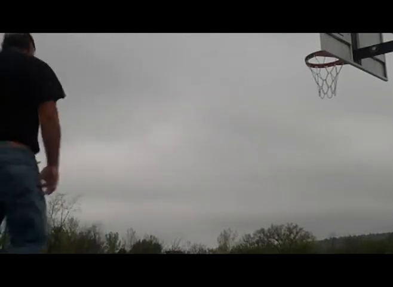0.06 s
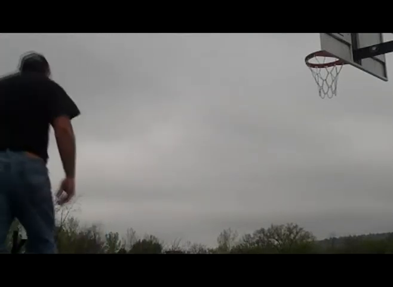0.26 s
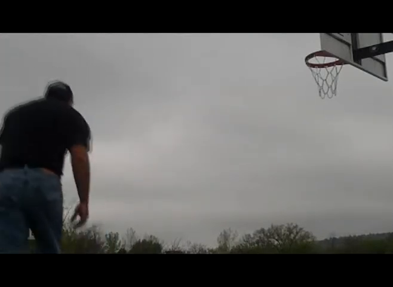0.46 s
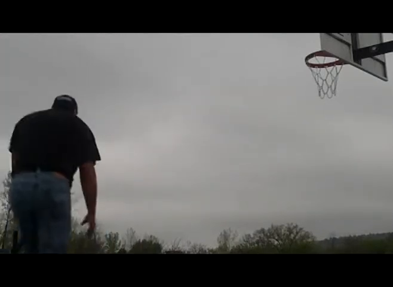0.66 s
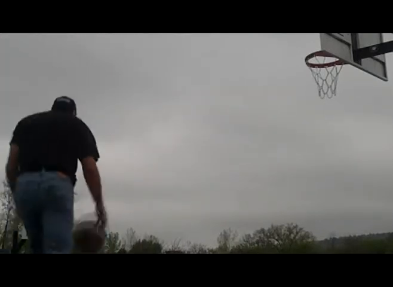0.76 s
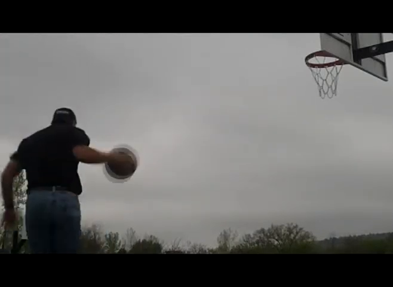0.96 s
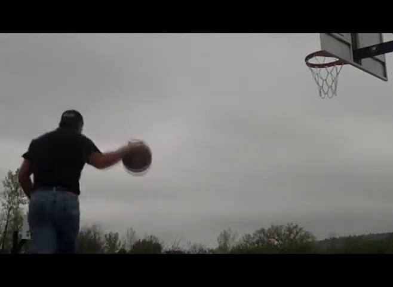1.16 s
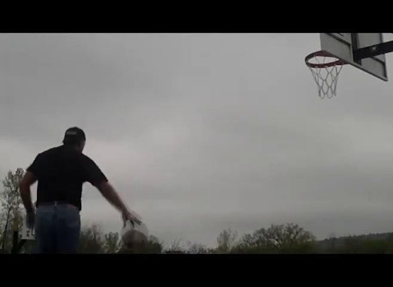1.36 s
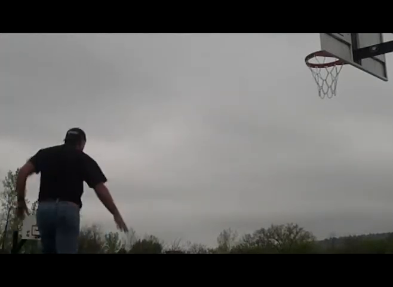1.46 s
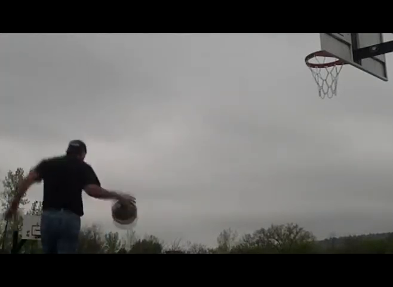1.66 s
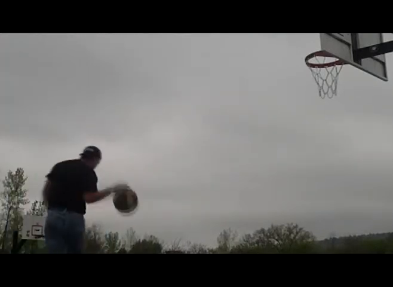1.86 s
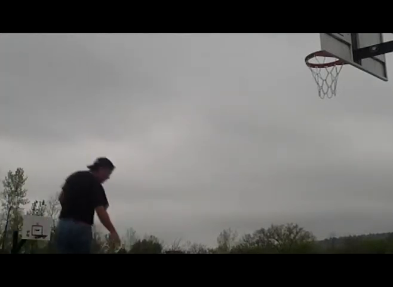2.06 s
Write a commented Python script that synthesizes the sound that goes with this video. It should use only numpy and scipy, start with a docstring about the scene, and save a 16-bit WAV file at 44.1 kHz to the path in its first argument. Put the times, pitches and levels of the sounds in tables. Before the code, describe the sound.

Three hollow basketball slaps on open-air hard ground, with gritty shoe scuffs and faint bird whistles

```python
"""A slowly fading outdoor hiss and a faint scuff, then at once the slap of a basketball on an open-air hard
court. Three bounces: each is a slap, a short hollow ring of struck modes and a snap as the ball leaves the
ground, plus noise bursts for grit and echo. Soles scuff as dense random grains, stones snap as short noise
bursts, feet and palm knock as single dull modes. Far birds whistle as gliding, randomly warbling sines. The
hiss is coloured noise; hiss and grit differ slightly between the two microphones."""
import sys
import numpy as np
from scipy import signal
from scipy.fft import rfft, irfft
from scipy.io import wavfile

SR = 44100
rng = np.random.default_rng(int(sys.argv[2]) if len(sys.argv) > 2 else 0)


def inscribe(sig):
    """Save sig as 16-bit PCM at rate SR to the path in sys.argv[1].

    A 1-D sig is mono; a 2-D sig holds one channel per row.
    Samples are clipped to [-1, 1] before scaling.
    """
    pcm = np.round(np.clip(np.atleast_2d(sig).T, -1, 1) * 32767)
    wavfile.write(sys.argv[1], SR, pcm.astype(np.int16))


N = 92610
T = np.arange(N) / SR

# distant traffic and trees: spectrum (frequency [Hz], weight [dB]); level (time [s], level [dB])
AIR_SPECTRUM = [(25, -33), (60, -21), (100, -15.5), (200, -10.5), (380, -2.5), (600, -0.5), (950, 2),
                (1250, -3), (1900, -11), (2900, -13.5), (3700, -22), (4600, -25.5), (6500, -30),
                (9000, -31.5), (11500, -35)]
AIR_LEVEL = [(0, -39), (.6, -42), (1.1, -42.5), (2.1, -43.5)]
# what the two microphones do not share: (frequency [Hz], weight [dB])
SIDE_SPECTRUM = [(100, -49), (400, -65), (650, -31), (1500, -17), (2400, -48), (3500, -35), (4800, -13),
                 (7500, -27)]
AIR_TOP_HZ, RECORDER_TOP_HZ = 11480, 15500

# bird whistles: (start [s], length [s], start pitch [Hz], end pitch [Hz], level [dB], rms warble [Hz])
WHISTLES = [(1.124, .035, 4100, 3820, -50, 240), (1.167, 0.077, 3200, 2710, -49.5, 141),
            (1.324, 0.044, 3450, 3180, -55, 80), (1.367, .08, 2670, 2405, -52, 70),
            (1.389, 0.083, 5400, 5900, -65, 218), (1.66, 0.055, 2700, 2610, -51, 24.9),
            (1.717, 0.18, 5550, 5280, -56.5, 425), (1.92, 0.078, 2890, 2870, -48.5, 40),
            (1.976, 0.045, 2645, 2660, -45.5, 45), (2.044, 0.074, 5680, 5400, -50, 403)]
# speed of the random warble: (frequency [Hz], weight [dB])
WARBLE_SPECTRUM = [(150, 2.5), (400, 0.5), (1500, -41)]

# soft knocks of feet and palm: (time [s], level [dB], pitch [Hz])
KNOCKS = [(.207, -23.5, 538), (0.2554, -18, 586), (0.3417, -15, 907), (.3915, -16, 870),
          (1.136, -26.5, 1110), (2.053, -29.5, 1410)]
KNOCK_T60_S = 0.022

# soles and clothes scuffing: (start [s], length [s], level [dB], low grind re scrape [dB])
SCUFFS = [(.008, 0.024, -36, -14), (0.081, 0.014, -37.5, 7), (0.191, 0.033, -34, -22),
          (0.246, 0.016, -47, 1), (0.286, 0.03, -47, 3.5), (0.325, 0.036, -37.5, 3), (.366, .015, -32, 1),
          (0.386, 0.046, -34, 2.5), (0.456, 0.026, -46, 0.5), (0.497, 0.0254, -38, -7),
          (0.801, 0.0098, -42.5, -2.5), (1.265, 0.02, -49, 1.5), (1.649, 0.024, -45, -2),
          (1.914, 0.031, -50.5, 0), (2.028, 0.037, -49, -2)]
# scrape and low grind of the grit: (frequency [Hz], weight [dB])
SCRAPE_SPECTRUM = [(400, -30), (1200, 1), (2200, -7), (3100, 7.5), (4200, -12.5), (5300, -9.5),
                   (7000, -23.5), (10000, -29.5), (12000, -26), (13500, -62)]
GRIND_SPECTRUM = [(150, -47.5), (500, -9), (900, 10.5), (1500, 7), (2500, 3), (4000, -24), (9000, -44.5)]
# flicker of the grip: (frequency [Hz], weight [dB])
GRIP_SPECTRUM = [(20, -20), (80, -1), (200, -2), (600, -42), (2000, -80)]
SCUFF_EDGE_S, GRIP_FLICKER_RMS_DB = 0.011, 3.5
GRAINS_PER_S, GRAIN_SPREAD_DB = 4900, 4
# grit snapping under a shoe: (time [s], level [dB], t60 [s], tilt [dB per octave])
TICKS = [(0.124, -40, 0.013, 1), (0.197, -17, 0.017, -7.5), (0.2016, -37, .016, 4), (0.344, -29, 0.011, -4),
         (0.3902, -29, 0.011, 0), (0.4148, -36, 0.015, -6), (0.433, -32.5, 0.02, -8),
         (0.4848, -21.5, .007, 1.5), (0.498, -20.5, 0.011, -2.5), (0.5138, -26, 0.015, -7),
         (0.9008, -33.5, 0.014, 10), (1.7203, -35.5, 0.015, 2)]
# a stone snapping, before tilt: (frequency [Hz], weight [dB])
SNAP_SPECTRUM = [(500, -17), (1500, -9), (3200, 18), (5500, 3), (8500, -6.5), (11500, -60)]
SNAP_RISE_S = 0.00016

# bounces: (landing [s], boom [dB], hollow ring [dB], smack [dB], crack [dB], fizz [dB], pitch [ratio],
#           contact [s], lift-off re landing [dB], flight ring [dB], echo [dB], favoured mode [Hz],
#           starved mode [Hz], crack pitch [ratio])
BOUNCES = [(0.0511, -10, -4, 0, 1.5, -18, 1.025, .0100, -17.5, -4.5, -3, 1250, 1810, 1.056),
           (0.7388, -15.5, -4, -14, -7.5, -28.5, 1.045, 0.0089, -8, -11, -0.5, 1010, 620, 1.09),
           (1.5582, -13, -11, -7, -1, -24.5, 0.984, 0.01, -15, -7.5, -2, 890, 1040, 1.078)]
# centres of boom, hollow ring, smack and crack: (frequency [Hz])
REGISTERS_HZ = [484, 953, 1500, 2730]
# modes of the squashed ball: (untuned pitch [Hz], level [dB], t60 [s])
BALL_MODES = [(165, -7, 0.032), (288, 2, 0.032), (473, 6, 0.026), (583, -32.5, 0.032), (740, 6, 0.01),
              (880.5, -4, 0.055), (1070, -5.5, 0.042), (1224, -14.5, 0.11), (1372, -16, 0.044),
              (1435, -3, 0.025), (1625, -6.5, 0.027), (1771, -5, 0.036), (2280, -3, 0.014),
              (2680, 7.5, 0.0086), (3370, -2.5, 0.0073)]
# ring of the ball in flight: (pitch [Hz], level [dB], t60 [s])
FLIGHT_MODES = [(414, -20, .11), (977, -33.5, 0.078)]
# grit under the ball, answer of the court: (frequency [Hz], weight [dB])
FIZZ_SPECTRUM = [(1500, -59), (3000, -9.5), (4500, 2), (6500, 2.5), (9000, -7), (12000, -16.5),
                 (16000, -47)]
ECHO_SPECTRUM = [(100, -24), (300, -14), (900, 5.5), (1500, 1), (2100, -4), (2900, -6.5), (4200, -17),
                 (8000, -35), (11500, -62), (13000, -66)]
BUILD_CYCLES, SWELL_S = 1, 0.0018  # attack: cycles of the mode, plus the time the slap takes to build
DAMP_AFTER_S, DAMP_S = 0.0069, 0.00076  # damping starts this long after lift-off; time constant
SPOT_DB, SPOT_WIDTH_HZ = 4.5, 140  # the spot that lands favours one mode and starves another
SPREAD_MAX_S, SPREAD_HZ = 0.0012, 1450  # the contact patch grows: modes below this pitch start later
FIZZ_RISE_S, FIZZ_T60_S, LIFT_FIZZ_DB = 0.0015, 0.013, -29
NEAR_ECHO_DB, NEAR_ECHO_DELAY_S, NEAR_ECHO_RISE_S, NEAR_ECHO_T60_S = -28, 0.0242, 0.0035, 0.052
FAR_ECHO_DB, FAR_ECHO_RISE_S, FAR_ECHO_T60_S = -39, 0.031, 0.88


def from_db(db):
    """Decibels to gain."""
    return 10 ** (np.asarray(db) / 20)


def rms_one(x):
    """Scale to unit power."""
    return x / np.sqrt(np.mean(x ** 2) + 1e-20)


def filtered(x, spectrum):
    """Weight x by a spectrum, interpolated in dB over log frequency."""
    hz, db = np.transpose(spectrum)
    bins_hz = np.maximum(np.arange(N // 2 + 1) * SR / N, 1)
    weight_db = np.interp(np.log(bins_hz), np.log(hz), db)
    return irfft(rfft(x) * from_db(weight_db), N)


def noise(spectrum):
    """Coloured Gaussian noise of unit power."""
    return rms_one(filtered(rng.standard_normal(N), spectrum))


def low_pass(x, hz):
    """Steep elliptic low-pass."""
    sos = signal.ellip(8, 0.2, 70, hz, fs=SR, output="sos")
    return signal.sosfilt(sos, x)


def strike(start_s, rise_s, t60_s):
    """Envelope of a blow: sine-squared rise times an exponential decay."""
    age_s = np.maximum(T - start_s, 0)
    rise = np.sin(np.pi / 2 * np.minimum(age_s / rise_s, 1)) ** 2
    return rise * np.exp(-np.log(1000) * age_s / t60_s)


def mode(start_s, hz, t60_s, swell_s=0):
    """One struck resonance, a decaying sine; the swell lengthens its attack."""
    envelope = strike(start_s, swell_s + BUILD_CYCLES / hz, t60_s)
    return envelope * np.sin(2 * np.pi * hz * (T - start_s))


def air():
    """Hiss of distant traffic and trees: coloured noise at a slowly falling level."""
    level_db = np.interp(T, *np.transpose(AIR_LEVEL))
    return from_db(level_db) * noise(AIR_SPECTRUM)


def birds():
    """Far whistles glide in pitch; a quick random warble turns some into buzzes."""
    out = np.zeros(N)
    for start_s, length_s, start_hz, end_hz, db, warble_hz in WHISTLES:
        along = np.clip((T - start_s) / length_s, 0, 1)
        glide_hz = start_hz + (end_hz - start_hz) * along
        pitch_hz = glide_hz + warble_hz * noise(WARBLE_SPECTRUM)
        breath = np.sqrt(np.abs(np.sin(np.pi * along)))
        out += from_db(db) * breath * np.sin(2 * np.pi * np.cumsum(pitch_hz) / SR)
    return out


def knocks():
    """Dull, short knocks of feet and palm, one mode each."""
    return sum(from_db(db) * mode(s, hz, KNOCK_T60_S) for s, db, hz in KNOCKS)


def grit(spectrum):
    """Dense grains of uneven size crushed under a sole, at unit power."""
    size_db = GRAIN_SPREAD_DB * np.minimum(rng.exponential(1, N), 4)
    grains = from_db(size_db) * rng.choice([-1, 1], N)
    crushed = rng.random(N) < GRAINS_PER_S / SR
    return rms_one(filtered(grains * crushed, spectrum))


def scuffs():
    """Soles drag over grit; an uneven grip makes the scrape and grind flicker."""
    out, scrape, grind = np.zeros(N), grit(SCRAPE_SPECTRUM), grit(GRIND_SPECTRUM)
    grip = from_db(GRIP_FLICKER_RMS_DB * noise(GRIP_SPECTRUM))
    for start_s, length_s, db, grind_db in SCUFFS:
        inside_s = np.minimum(T - start_s, start_s + length_s - T)
        press = np.clip(inside_s / SCUFF_EDGE_S + 0.5, 0, 1) ** 1.48
        out += from_db(db) * press * grip * (scrape + from_db(grind_db) * grind)
    return out


def stone_snaps():
    """Single stones snap as noise bursts tilted per octave: small stones are brighter."""
    out = np.zeros(N)
    for s, db, t60_s, tilt_db in TICKS:
        tilted = [(hz, weight_db + tilt_db * np.log2(hz)) for hz, weight_db in SNAP_SPECTRUM]
        out += from_db(db) * noise(tilted) * strike(s, SNAP_RISE_S, t60_s)
    return out


def shoes():
    """Shoes on grit: dragging soles plus snapping stones."""
    return scuffs() + stone_snaps()


def squashed_ball(land_s, lift_s, lift_db, register_db, pitches, strong_hz, weak_hz):
    """Landing and lift-off strike the same modes, which are damped soon after lift-off."""
    out = np.zeros(N)
    damping = np.exp(-np.maximum(T - lift_s - DAMP_AFTER_S, 0) / DAMP_S)
    for k, (hz, db, t60_s) in enumerate(BALL_MODES):
        strong, weak = np.exp(-((hz - np.array([strong_hz, weak_hz])) / SPOT_WIDTH_HZ) ** 2)
        spot_db = SPOT_DB * (strong - weak)
        blow_db = np.interp(np.log(hz), np.log(REGISTERS_HZ), register_db)
        tuned_hz = hz * np.interp(hz, REGISTERS_HZ[2:], pitches)
        late_s = SPREAD_MAX_S / (1 + (hz / SPREAD_HZ) ** 2) ** 2
        landing = mode(land_s + late_s, tuned_hz, t60_s, SWELL_S)
        lift_off = from_db(lift_db) * mode(lift_s, tuned_hz, t60_s, SWELL_S)
        sign = (-1) ** k  # neighbouring modes start in opposite phase
        out += sign * from_db(db + spot_db + blow_db) * damping * (landing + lift_off)
    return out


def fizz_envelope(land_s, lift_s):
    """Grit under the ball is crushed at landing and, far more weakly, at lift-off."""
    landing = strike(land_s, FIZZ_RISE_S, FIZZ_T60_S)
    return landing + from_db(LIFT_FIZZ_DB) * strike(lift_s, FIZZ_RISE_S, FIZZ_T60_S)


def flight_ring(lift_s):
    """The ball rings freely once it has left the ground."""
    return sum(from_db(db) * mode(lift_s, hz, t60_s) for hz, db, t60_s in FLIGHT_MODES)


def echo_envelope(land_s):
    """The court answers with a short delayed echo and a long, slowly rising one."""
    near = strike(land_s + NEAR_ECHO_DELAY_S, NEAR_ECHO_RISE_S, NEAR_ECHO_T60_S)
    far = strike(land_s, FAR_ECHO_RISE_S, FAR_ECHO_T60_S)
    return from_db(NEAR_ECHO_DB) * near + from_db(FAR_ECHO_DB) * far


def ball():
    """Each bounce sums the squashed ball, grit fizz, flight ring and court echo."""
    out, fizz, echo = np.zeros(N), noise(FIZZ_SPECTRUM), noise(ECHO_SPECTRUM)
    for (land_s, boom_db, hollow_db, smack_db, crack_db, fizz_db, pitch, contact_s, lift_db,
         ring_db, echo_db, strong_hz, weak_hz, crack_pitch) in BOUNCES:
        lift_s = land_s + contact_s
        register_db = [boom_db, hollow_db, smack_db, crack_db]
        pitches = [pitch, crack_pitch]
        out += squashed_ball(land_s, lift_s, lift_db, register_db, pitches, strong_hz, weak_hz)
        out += from_db(fizz_db) * fizz * fizz_envelope(land_s, lift_s)
        out += from_db(ring_db) * flight_ring(lift_s)
        out += from_db(echo_db) * echo * echo_envelope(land_s)
    return out


def scene():
    """Ball, knocks and birds are central; fresh hiss and grit, in opposite sign, widen the rest."""
    mid = air() + birds() + knocks() + shoes()
    side = filtered(air() + shoes(), SIDE_SPECTRUM)
    background = mid + side * np.array([[1], [-1]])
    return low_pass(background, AIR_TOP_HZ) + ball()


def record(dry):
    """The hardest slap overloads the recorder, which saturates near full scale; the top is cut."""
    saturated = dry / (1 + dry ** 8) ** (1 / 8)
    return low_pass(saturated, RECORDER_TOP_HZ)


dry = scene()
out = record(dry)
inscribe(out)
```